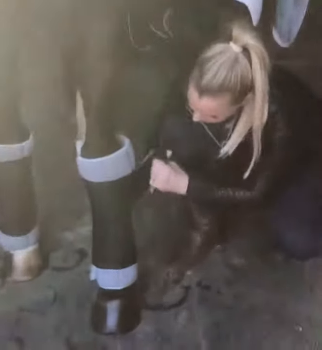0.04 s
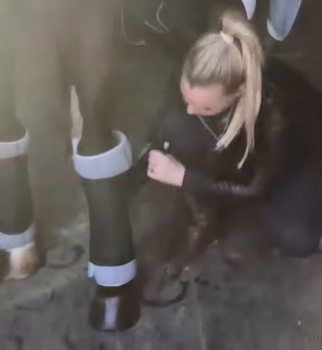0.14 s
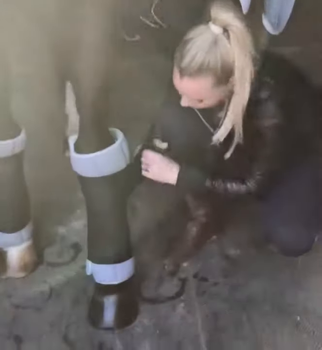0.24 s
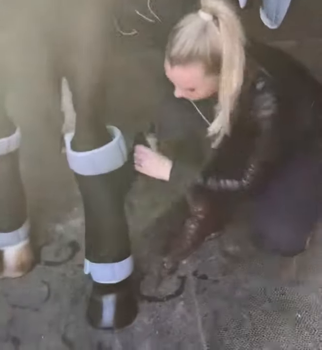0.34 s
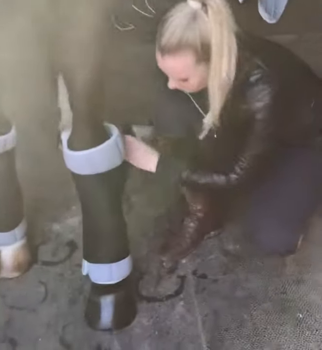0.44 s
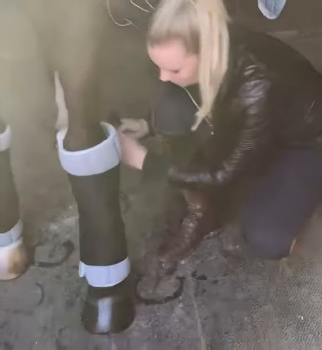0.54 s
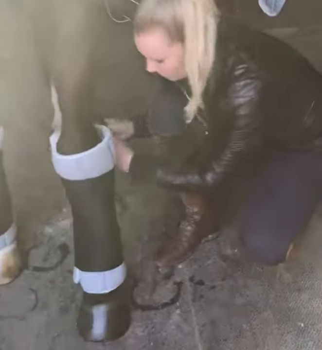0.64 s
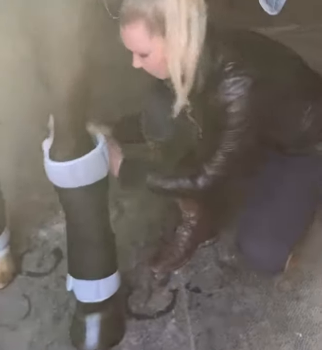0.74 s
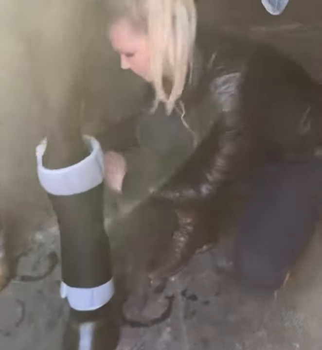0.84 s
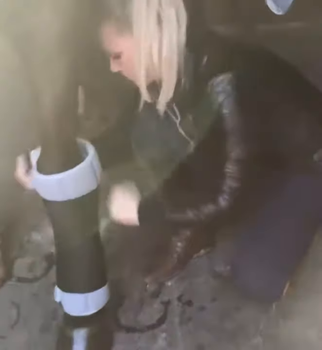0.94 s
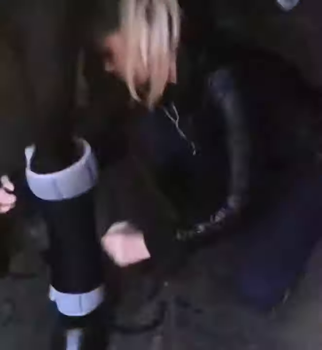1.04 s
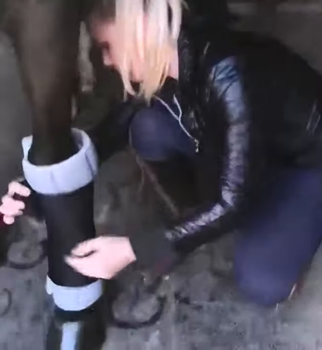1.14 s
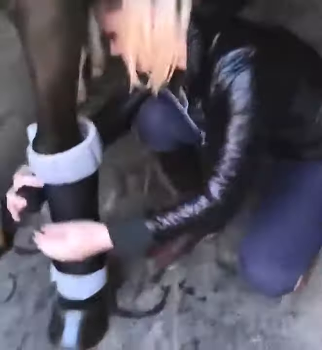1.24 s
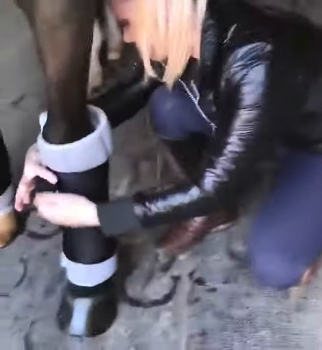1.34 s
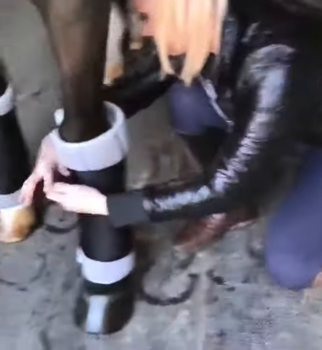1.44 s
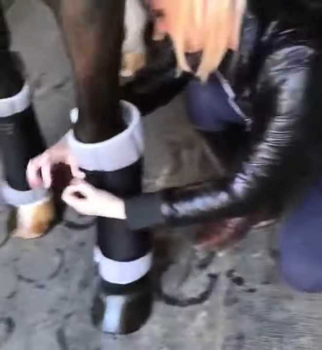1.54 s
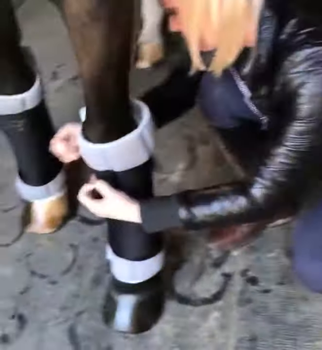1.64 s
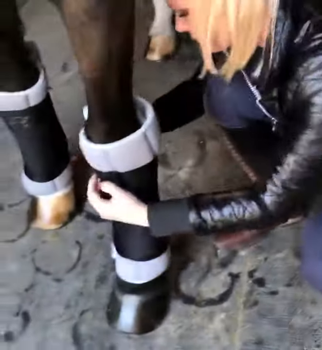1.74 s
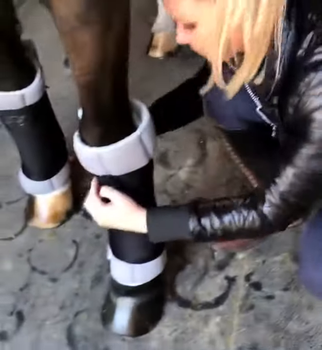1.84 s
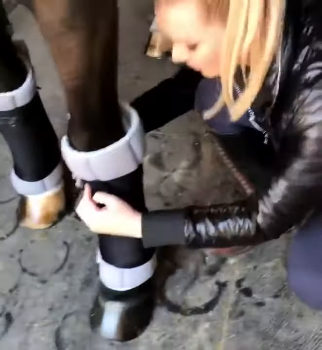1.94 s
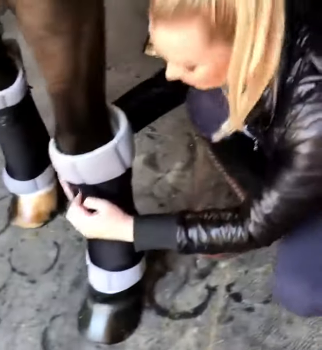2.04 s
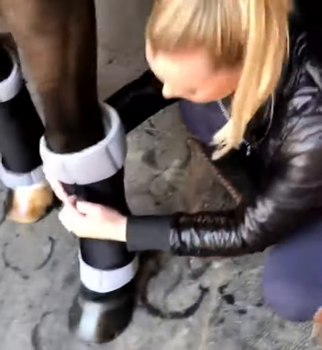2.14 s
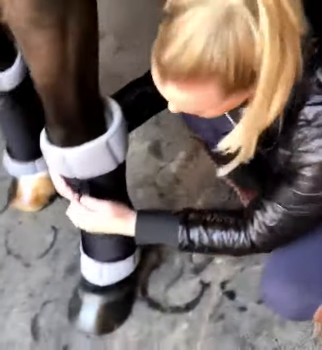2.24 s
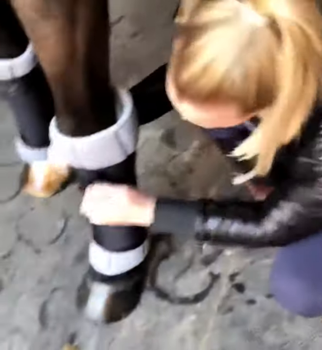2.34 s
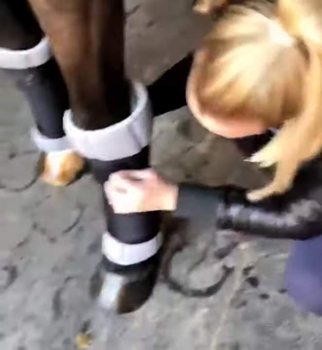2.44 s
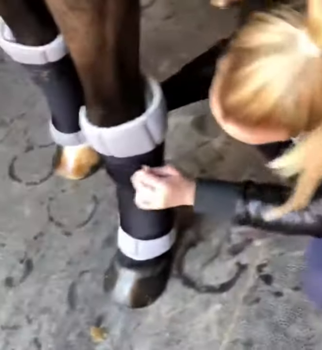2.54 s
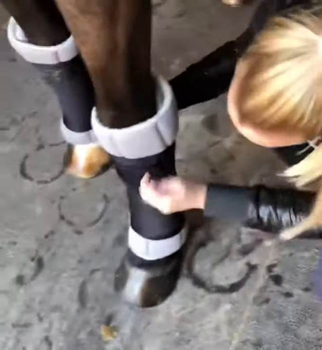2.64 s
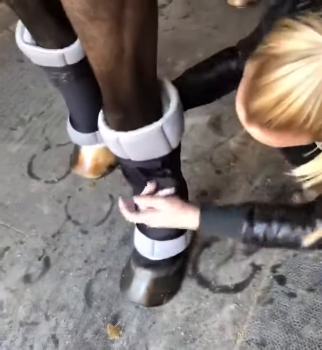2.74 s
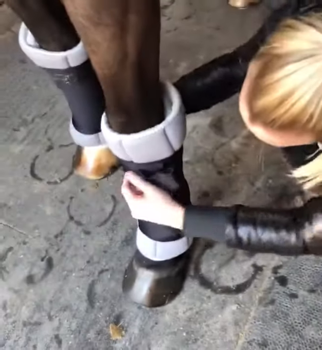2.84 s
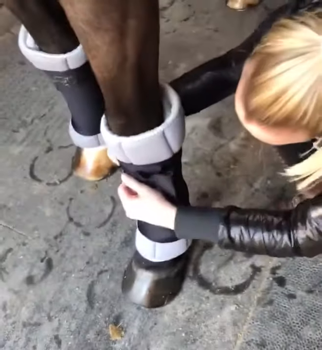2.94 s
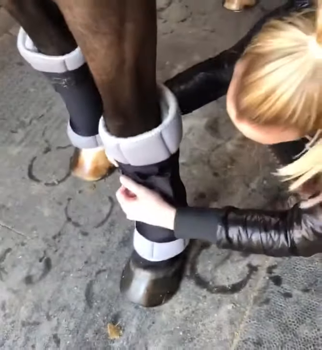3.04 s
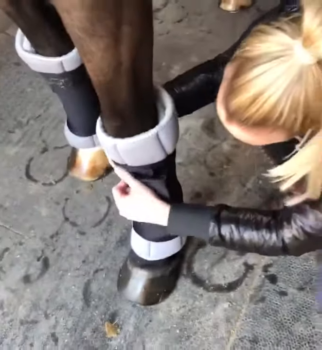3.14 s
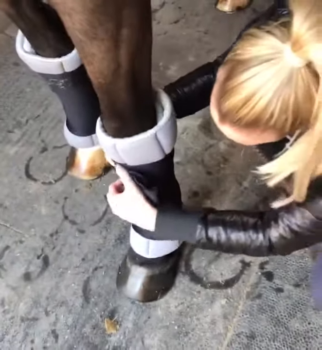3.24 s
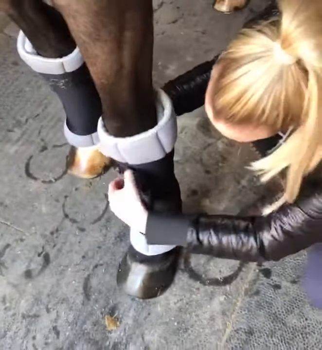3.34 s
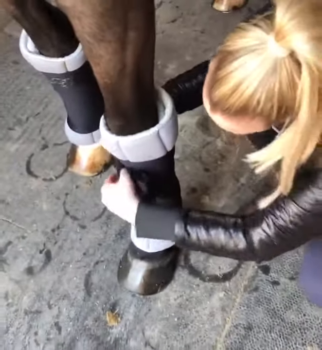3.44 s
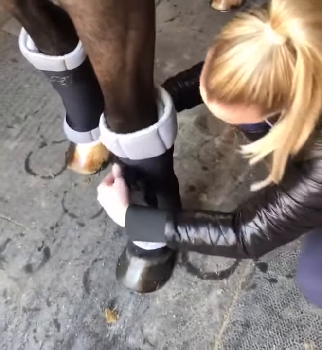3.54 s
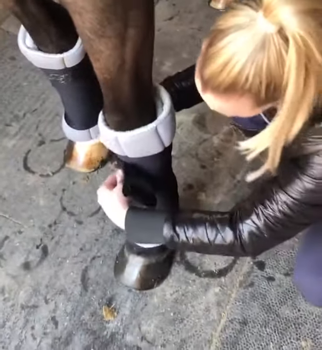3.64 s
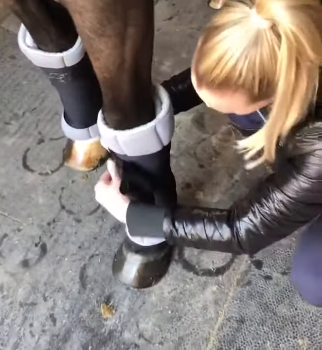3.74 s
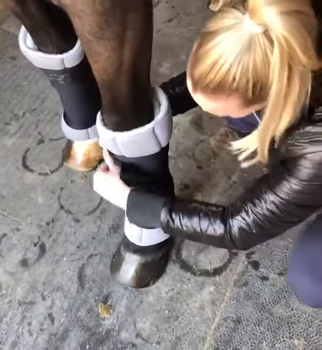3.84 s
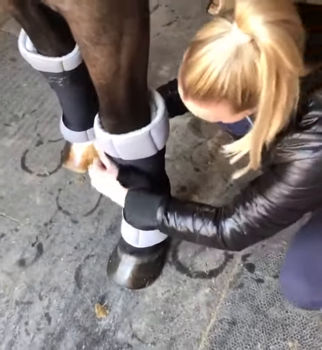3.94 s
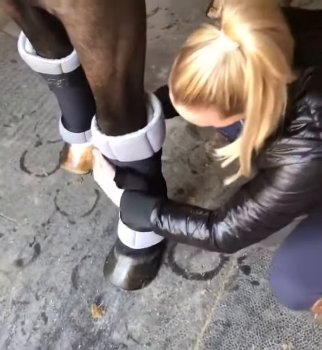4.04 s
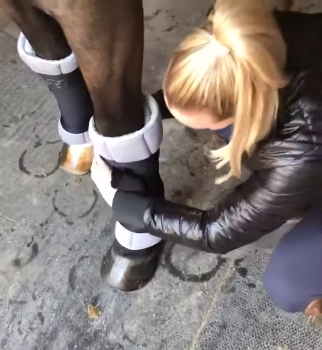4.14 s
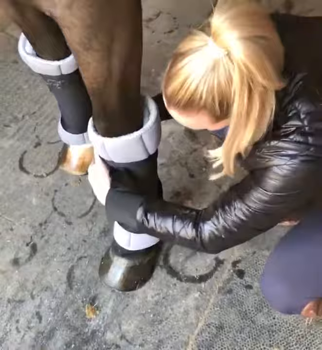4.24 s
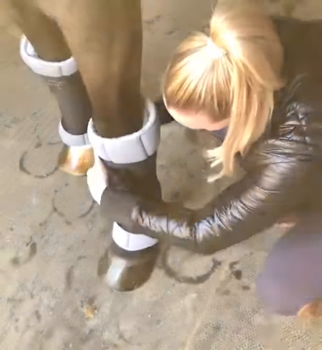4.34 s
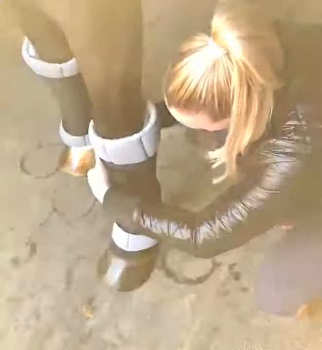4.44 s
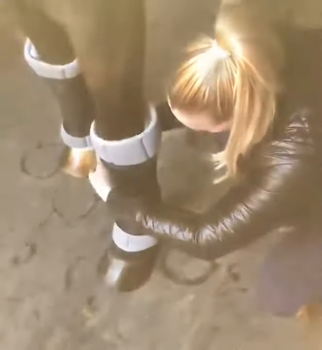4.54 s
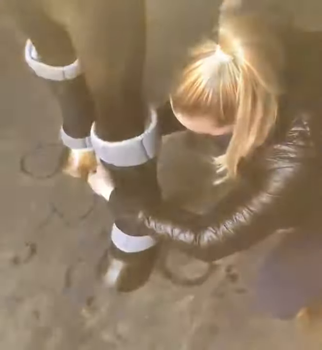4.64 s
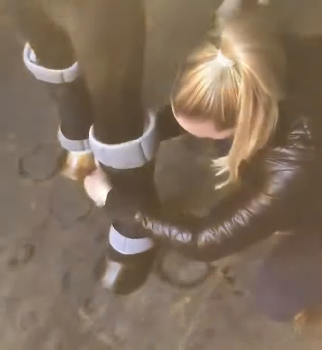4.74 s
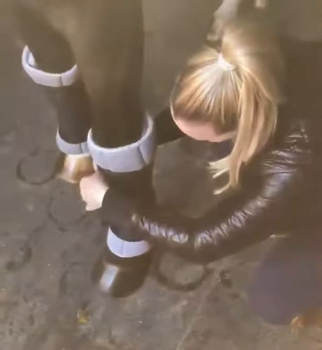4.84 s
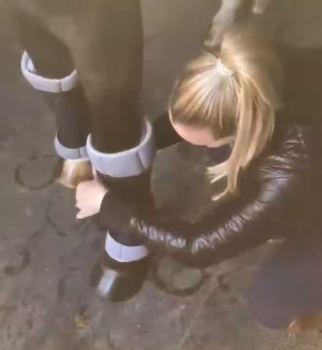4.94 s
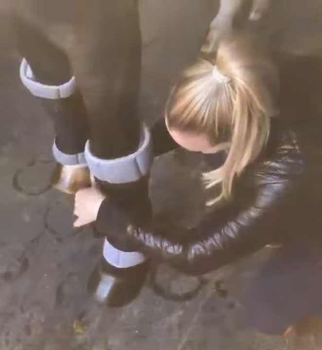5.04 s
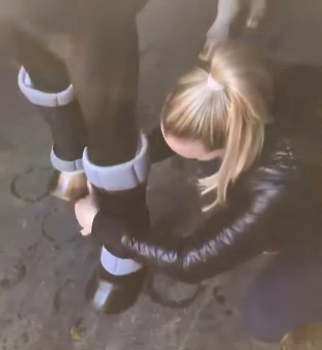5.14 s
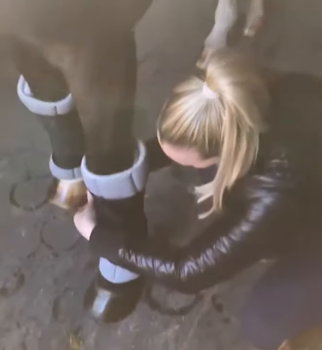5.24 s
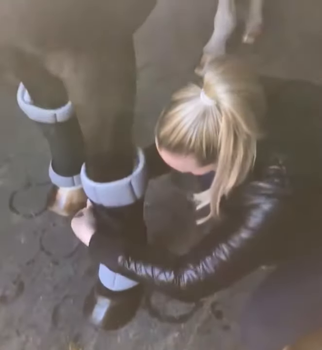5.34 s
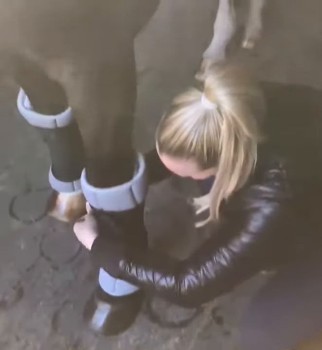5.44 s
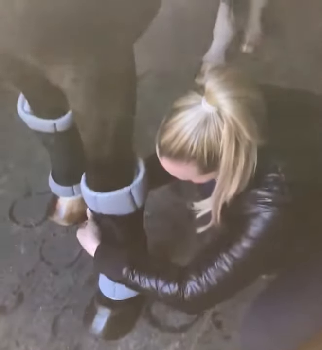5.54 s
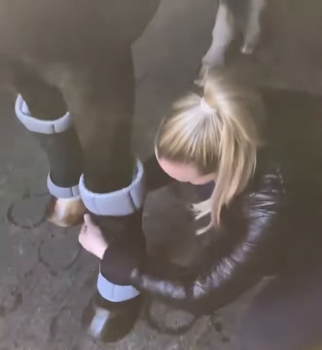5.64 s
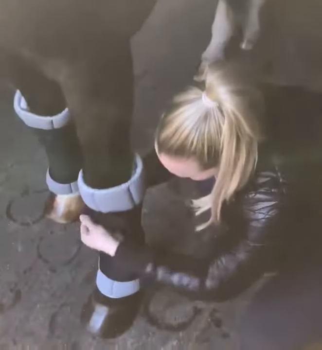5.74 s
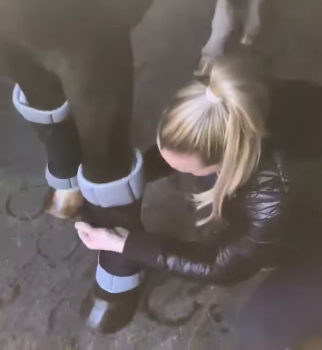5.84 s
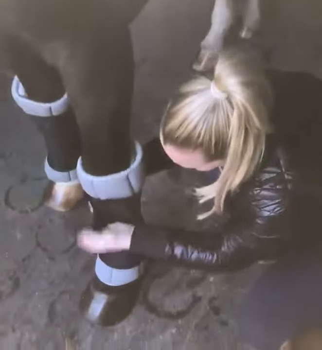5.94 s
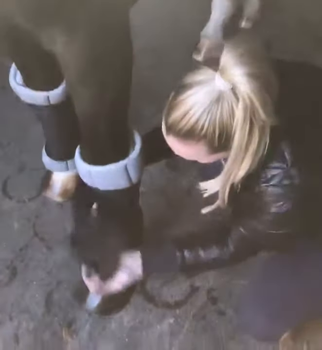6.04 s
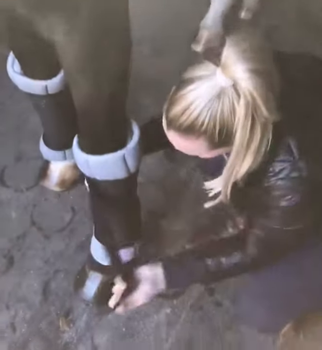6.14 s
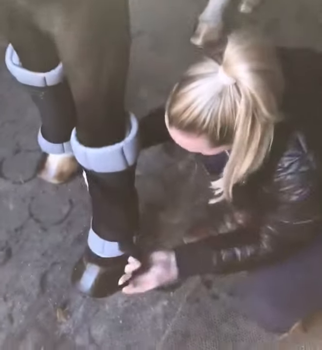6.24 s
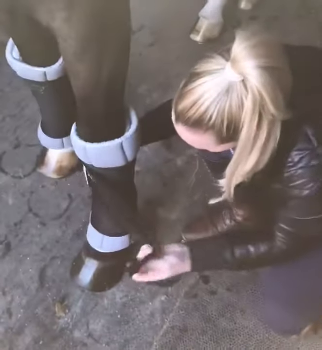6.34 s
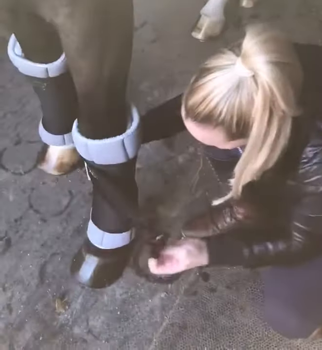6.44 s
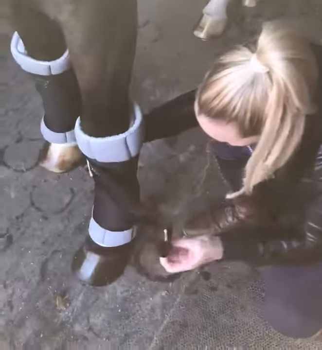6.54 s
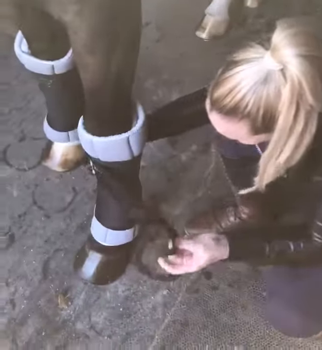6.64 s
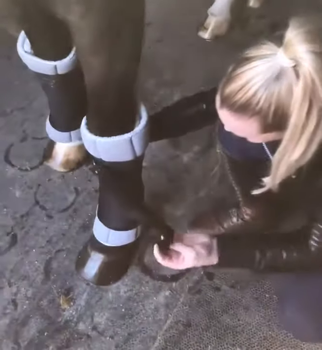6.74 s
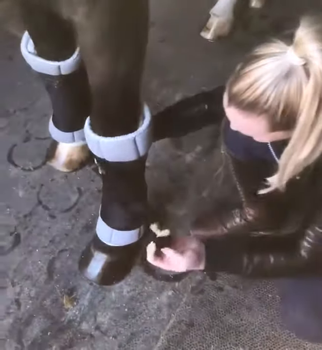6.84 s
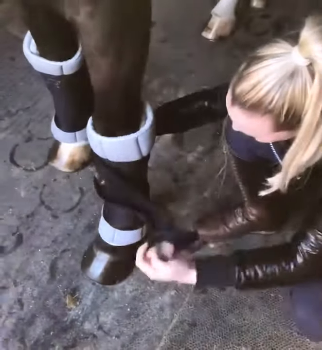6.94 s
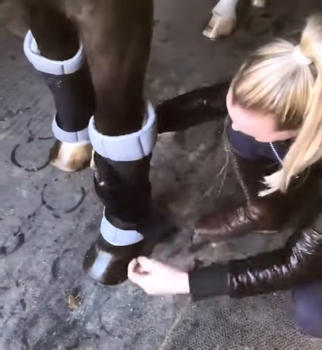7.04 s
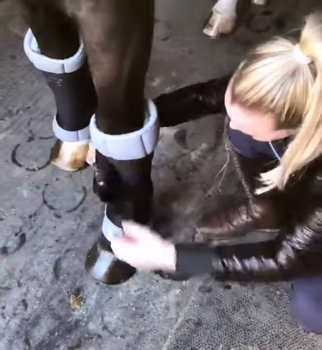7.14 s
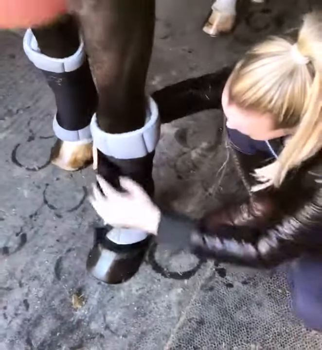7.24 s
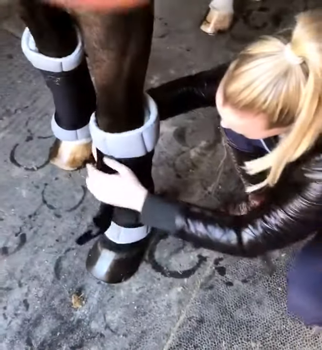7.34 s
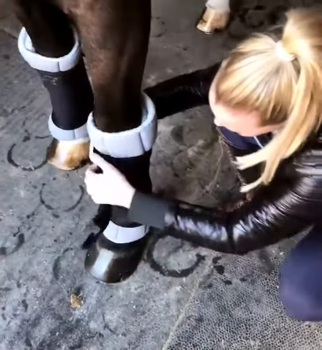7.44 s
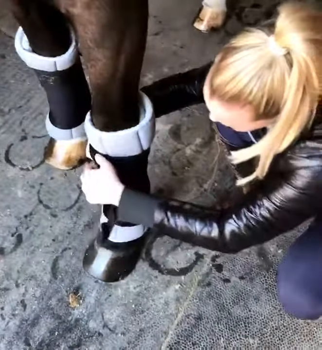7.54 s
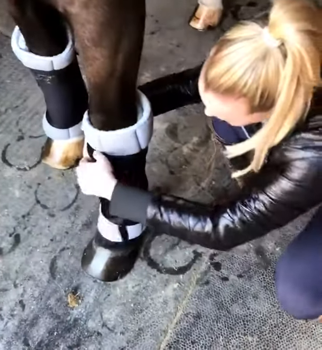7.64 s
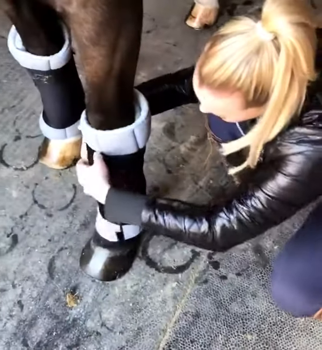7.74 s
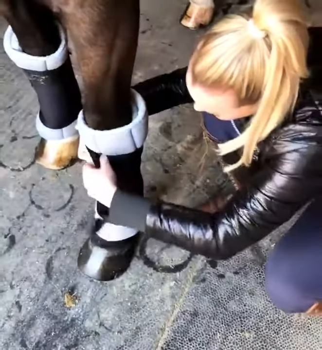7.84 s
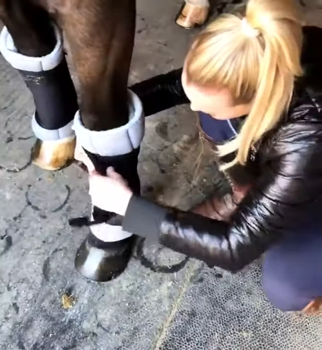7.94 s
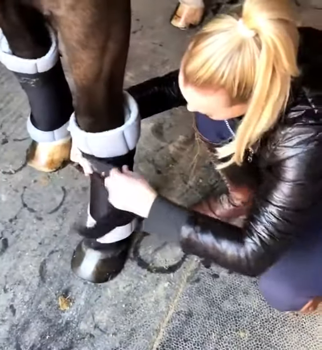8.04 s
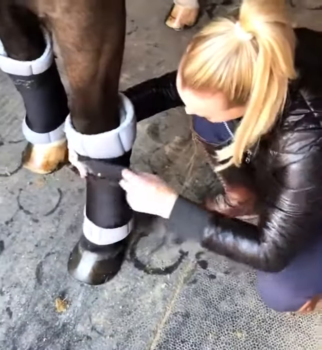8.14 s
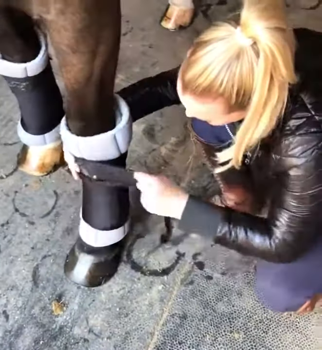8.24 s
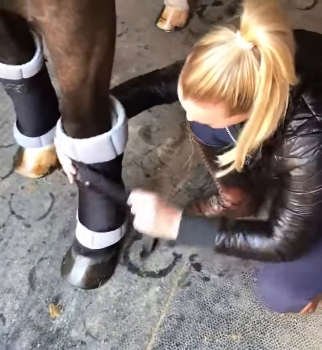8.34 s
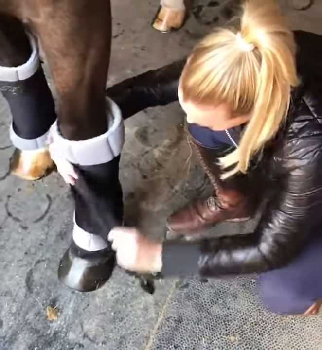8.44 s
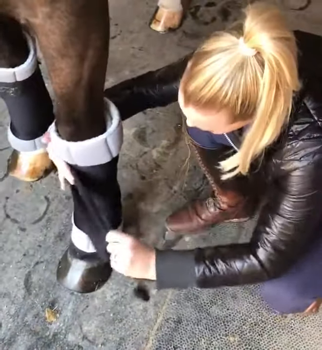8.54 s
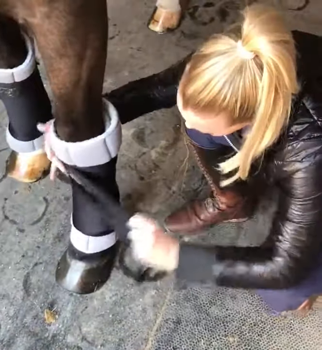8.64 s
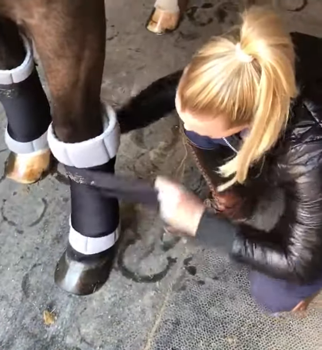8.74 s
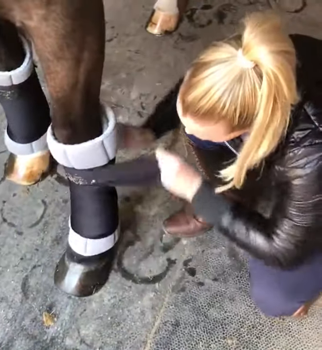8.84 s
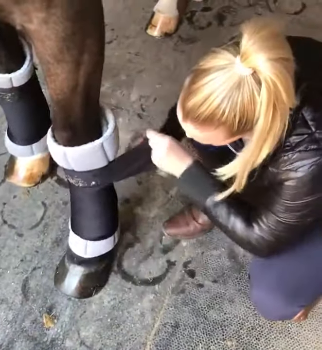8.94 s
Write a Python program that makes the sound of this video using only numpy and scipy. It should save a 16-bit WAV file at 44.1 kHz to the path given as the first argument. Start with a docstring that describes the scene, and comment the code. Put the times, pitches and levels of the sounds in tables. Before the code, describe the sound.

Close, fairly dry sound of hands working on a horse's leg wrap: crisp cloth strokes, pats on padding, tiny snaps and ticks. A faint metallic ring sounds midway, then a strap is torn open in a brief, loud, crackling surge that stops with a knock. Afterwards it is calmer, with short rustles and clicks. A distant low hum, gentle building hiss and occasional soft floor rumble stay underneath.

```python
"""Fitting a horse's leg wrap

In a stable, sleeves and wrap rustle and slide (noise and tiny clicks, shaped stroke by stroke), hooks snap and
hands pat the padding (short puffs of noise), and one strap of hooks and loops is torn open (dense clicks in surges).
Small clicks, knocks and a metal clank are fading sine waves. Behind them a distant motor hums (a stack of sines),
a second low tone joins for a while, the floor rumbles now and then, and the building's air hisses (steady noise)."""
import sys
import numpy as np
from scipy import signal
from scipy.fft import rfft, irfft, next_fast_len
from scipy.io import wavfile

SR = 44100
rng = np.random.default_rng(int(sys.argv[2]) if len(sys.argv) > 2 else 0)


def wav_out(sig):
    """Save sig, one row per channel (or a flat mono array), as 16-bit PCM at SR to the path in sys.argv[1]."""
    wavfile.write(sys.argv[1], SR, np.round(np.clip(np.atleast_2d(sig).T, -1, 1) * 32767).astype(np.int16))


N = 396459  # length in samples, about 9 s

# Strokes of cloth on cloth: start t/s, length/s, middle level/dB, top treble against it/dB,
# dull padding against it/dB
STROKES = [(0, 0.19, -57, -2.5, -7), (0.311, 0.11, -58, -9, -5), (0.5, 0.16, -57.5, -15, -10.5),
           (0.7, 0.25, -61, -9, -7.5), (1.08, 0.069, -60.5, -4.5, -6), (1.196, 0.052, -59.5, 0, -16),
           (1.268, 0.093, -60, -3.5, -11), (1.41, 0.03, -57.5, -0.5, -4), (1.538, 0.15, -51, -5.5, -19),
           (1.709, 0.054, -48.5, 0.5, -17.5), (1.777, 0.35, -51.5, -2.5, -17),
           (2.11, 0.32, -57.5, -3.5, -12.5), (2.4, 0.1, -53.5, -9, -10), (2.557, 0.2, -56, -5.5, -10.5),
           (2.919, 0.048, -56, -6, -15.5), (3.29, 0.055, -57.5, 1.5, -31), (3.449, 0.084, -56.5, -3.5, -12),
           (3.902, 0.14, -60, -3, -22), (4.302, 0.076, -62, -4, -4.5), (4.481, 0.16, -55, -3.5, -15),
           (4.665, 0.28, -59, -3, -15), (5.003, 0.24, -56.5, -5, -23), (5.307, 0.13, -59.5, -7, -9),
           (5.519, 0.042, -51, -4, -6.5), (5.61, 0.11, -51.5, -5.5, -17), (6.088, 0.28, -64, -27, -1),
           (6.402, 0.26, -65.5, -19, -3.5), (6.889, 0.09, -53.5, -9, -14.5),
           (7.105, 0.15, -60.5, -0.5, -14), (7.175, 0.12, -55.5, 0, -8), (7.511, 0.13, -57, -0.5, -9.5),
           (7.808, 0.084, -59.5, -4, -1.5), (7.89, 0.41, -84, -28, 21), (8.17, 0.17, -60.5, -1, -7),
           (8.378, 0.14, -60, -4.5, -2), (8.616, 0.32, -80.5, -16, 13.5), (8.914, 0.028, -61.5, -3, -10)]


def from_db(db):
    """Turn a level in dB into a gain."""
    return 10 ** (np.asarray(db) / 20)


def rms_one(x):
    """Scale a sound to an average strength (rms) of 1."""
    return x / np.sqrt(np.mean(x ** 2) + 1e-20)


def in_time(rows):
    """Draw straight lines between the rows of a curve table: one value a sample for each column."""
    s, *columns = np.transpose(rows)
    return [np.interp(np.arange(N) / SR, s, c) for c in columns]


def at_hz(points, hz):
    """Read a spectrum table at any pitch, with pitch spaced as on a keyboard (log frequency)."""
    table_hz, table_db = np.transpose(points)
    return np.interp(np.log(hz), np.log(table_hz), table_db)


def drift(rate):
    """Slow random wandering with rms 1: noise smoothed twice, so that a higher rate wanders faster."""
    r = np.exp(-80 * np.pi * rate / SR)  # one noise value per 40 samples
    noise = rng.standard_normal(N // 40 + 2002)
    slow = signal.lfilter([1], [1, -2 * r, r * r], noise)[2000:]
    return np.interp(np.arange(N) / 40, np.arange(len(slow)), rms_one(slow))


def resonance(x, hz, width_hz):
    """Let one pitch ring: a two-pole peak with gain 1 on top; the narrower, the longer it rings."""
    r = np.exp(-np.pi * width_hz / SR)
    feedback = [1, -2 * r * np.cos(2 * np.pi * hz / SR), r * r]
    return signal.lfilter([(1 - r * r) / 2, 0, (r * r - 1) / 2], feedback, x)


def coloured(x, spectrum):
    """Make each pitch of x louder or softer as a spectrum table says."""
    size = next_fast_len(N)
    hz = np.maximum(np.arange(size // 2 + 1) * SR / size, 1)
    return irfft(rfft(x, size) * from_db(at_hz(spectrum, hz)), size)[:N]


def band(x, low_hz, high_hz):
    """Keep mainly the pitches between two limits."""
    return signal.sosfilt(signal.butter(2, [low_hz, high_hz], "band", fs=SR, output="sos"), x)


def split(x, edges_hz):
    """Cut x into softly overlapping bands that add up to x between the outer edges."""
    size = next_fast_len(N)
    octave = np.log2(np.arange(1, size // 2 + 2) * SR / size)
    spectrum = rfft(x, size)
    below = [.5 - .5 * np.tanh(5 * (octave - np.log2(hz))) for hz in edges_hz]
    return [irfft(spectrum * (high - low), size)[:N] for low, high in zip(below, below[1:])]


def grains(per_s, spread_db, hiss, sharpness):
    """Fibres slipping: uneven clicks, each ringing briefly at one of 16 pitches, over a fine hiss; rms 1."""
    sizes = from_db(spread_db * np.minimum(rng.exponential(1, N), 5)) * rng.choice([-1, 1], N)
    clicks = sizes * (rng.random(N) < per_s / SR) + 1e-18
    dealt = rng.integers(0, 16, N)
    pitches = np.geomspace(150, 16000, num=16)
    rings = sum(resonance(clicks * (dealt == k), hz, hz / sharpness) for k, hz in enumerate(pitches))
    return rms_one(rms_one(rings) + hiss * rng.standard_normal(N))


def bursts(events, sharpness, broad, rise_s, spread):
    """Dying puffs of noise: part rings at the puff's own colour, part fills a band around it."""
    length = 16384  # every puff is also faded to nothing within this many samples, 0.37 s
    out, t = np.zeros(N + length), np.arange(length) / SR
    for (s, db, hz, t60), noise in zip(events, rng.standard_normal((len(events), length))):
        fade = from_db(-60 * t / max(t60, .003)) * (1 - t / t[-1])
        puff = noise * fade * np.minimum(t / rise_s, 1)
        rung = rms_one(resonance(puff, hz, hz / sharpness))
        wide = rms_one(band(puff, hz / spread, min(hz * spread, .4 * SR)))
        x = rung + broad * wide
        out[round(s * SR):][:length] += from_db(db) * x / np.abs(x).max()
    return out[:N]


def stable_air():
    """Steady rumble and hiss of the building: coloured noise whose level trembles slightly."""
    # Colour of the air: f/Hz, gain/dB
    air_colour = [(20, -30), (40, -20.5), (64, -2), (119, -6.5), (169, -5), (315, -10.5), (459, -20),
                  (1000, -18), (3200, -24), (6300, -33), (9000, -44.5), (15700, -33.5)]
    level_db = -64  # of the part above 340 Hz
    x = coloured(rng.standard_normal(N), air_colour)
    return from_db(level_db + 0.53 * drift(18.0)) * x / np.std(band(x, 340, 22000))


def motor():
    """Sines at multiples of the turning rate; each swells and fades on its own on the way here."""
    # Parts of the hum: multiple of the turning rate, level/dB
    multiples = [(2, -60.5), (3, -67.5), (4, -71), (5, -62), (6, -66.5), (7, -71), (8, -77.5), (9, -73),
                 (10, -77)]
    # Slow swell about those levels: t/s, second multiple/dB, seventh multiple/dB, fifth multiple/dB
    swell_curves = [(0.0, 3, 7.5, 3), (0.45, -7, 6, 4.5), (1.85, 3, 6.5, -3.5), (4.5, 1, -1.5, -2.5),
                    (7, -0.5, -3.5, 0), (8.16, -4, 5.5, 0.5), (8.99, 1.5, -0.5, -6)]
    motor_hz = 32.3  # average turning rate
    swell_db = dict(zip([2, 7, 5], in_time(swell_curves)))
    turn = 2 * np.pi * np.cumsum(motor_hz * (1 + 0.00086 * drift(0.43))) / SR
    out = np.zeros(N)
    for (k, db), start in zip(multiples, rng.uniform(0, 2 * np.pi, len(multiples))):
        level_db = db + swell_db.get(k, 2.7 * drift(0.37))
        out += np.sqrt(2) * from_db(level_db) * np.sin(k * turn + start)
    return out


def drone():
    """A second low tone that beats with the hum for a while: one sine that fades in and out."""
    # Course of the tone: t/s, f/Hz, level/dB
    tone_course = [(.6, 94.2, -63), (2.2, 94.2, -64), (5.5, 94.2, -73)]
    t, (hz, db) = np.arange(N) / SR, in_time(tone_course)
    fade = np.clip(np.minimum(t - tone_course[0][0], tone_course[-1][0] - t) / 0.52, 0, 1)
    return np.sqrt(2) * fade * from_db(db) * np.sin(2 * np.pi * np.cumsum(hz) / SR)


def rumbles():
    """Low rumbles through the floor: deep puffs of noise with a soft start."""
    # Rumbles: t/s, peak/dB, colour f/Hz, t60/s (time to fade by 60 dB, before the puff's own end fade)
    rumble_events = [(6.0, -45.5, 113, 0.7), (8.27, -53, 50, 2.5)]
    return bursts(rumble_events, sharpness=2.6, broad=0.3, rise_s=0.028, spread=1.3)


def clank():
    """Loose metal knocked: sines ring together, the lowest builds up late, then all are damped."""
    # Ways the metal rings: f/Hz, level/dB against the clank's level, t60/s, build-up/s
    metal_modes = [(366, 0.5, 0.95, 0.019), (632, -9, 0.31, 0.0037), (1415, -8, 0.3, 0.0028),
                   (1600, -8, 0.47, .003), (1911, -2, 0.5, 0.002), (2170, 19, 0.066, 0.01),
                   (2080, -1.5, 0.36, 0.004), (1265, -5, 0.1, 0.002)]
    clank_s, clank_db = 4.785, -46
    damped_s, damping_db, wobble_db = .062, 10, 3  # damping starts this long after the knock
    t = np.maximum(np.arange(N) / SR - clank_s, 0)
    rings = np.zeros(N)
    for k, (hz, db, t60, swell) in enumerate(metal_modes):
        gain = from_db(db - 60 * t / t60 + wobble_db * drift(45)) * np.minimum(t / swell, 1)
        rings += gain * np.sin(2 * np.pi * hz * t) * (-1) ** k
    drop_db = np.clip(2500 * (t - damped_s), 0, damping_db)
    return from_db(clank_db - drop_db) * rings


def ticks():
    """Clean clicks and knocks: one sharp push rings a few cycles; harder cracks add higher and lower tones."""
    # Clicks and knocks: t/s, level/dB, ring f/Hz, t60/s, crack (0 to 1)
    tick_events = [(2.3347, -43, 360, 0.027, 0.3), (3.275, -42.5, 1450, 0.0063, 0.7),
                   (3.984, -42, 3970, 0.0035, 0.4), (6.011, -33, 945, 0.057, .1),
                   (6.0167, -19.5, 2650, 0.006, 0.2), (7.176, -29, 2210, 0.0039, 0.76),
                   (7.756, -46.5, 1280, 0.0094, .2), (7.779, -39, 2020, 0.0053, .3),
                   (8.268, -34, 1750, 0.0051, 0.26)]
    out, t = np.zeros(N), np.arange(4096) / SR
    for s, db, hz, t60, crack in tick_events:
        turn, fade = 2 * np.pi * hz * t, from_db(-60 * t / t60)
        ring = fade * np.sin(turn) + .8 * fade ** 1.4 * np.sin(1.7 * turn)
        ring += crack * (fade ** 1.4 * np.sin(2.7 * turn) - np.sqrt(fade) * np.sin(turn / 2) / 2)
        out[round(s * SR):][:4096] += from_db(db) * np.minimum(t * hz, 1) * ring * 2
    return out


def pats():
    """Hands patting the padding: dull puffs of noise."""
    # Pats: t/s, peak/dB, colour f/Hz, t60/s
    pat_events = [(0.499, -42, 360, 0.079), (1.486, -43, 277, 0.033), (2.027, -43.5, 335, 0.067),
                  (2.049, -38.5, 784, 0.15), (2.095, -42.5, 934, 0.13), (2.465, -40.5, 446, 0.035),
                  (2.606, -40, 480, 0.21), (2.611, -42, 1020, 0.062), (2.635, -48, 570, 0.063),
                  (4.513, -32, 1000, 0.016), (4.697, -38.5, 990, 0.088), (5.349, -41, 860, 0.03),
                  (5.706, -34.5, 1030, 0.015)]
    return bursts(pat_events, sharpness=2.2, broad=0.5, rise_s=0.004, spread=1.8)


def snaps():
    """Single hooks and creases snapping: mostly bright puffs of noise with a wide spread of pitches."""
    # Snaps: t/s, peak/dB, colour f/Hz, t60/s
    snap_events = [(0.7937, -38.5, 3660, 0.18), (1.28, -33.5, 3300, 0.039), (1.3079, -36, 7270, 0.016),
                   (1.526, -35.5, 3400, 0.05), (1.6062, -26.5, 4270, 0.046), (1.641, -35, 5500, 0.025),
                   (2.0972, -31.5, 7700, 0.04), (2.4638, -30, 7750, 0.0095), (3.138, -49, 6340, 0.04),
                   (3.1714, -43, 7400, 0.096), (3.226, -38.5, 7460, 0.045), (3.3754, -44, 8500, 0.025),
                   (3.4037, -41.5, 8400, 0.034), (3.6506, -36, 7000, 0.036), (3.77, -43.5, 980, 0.024),
                   (4.5132, -32, 1470, 0.038), (4.6959, -31.5, 1580, 0.03), (4.785, -35, 1720, 0.028),
                   (4.8606, -31, 5130, 0.012), (4.8868, -39.5, 3360, 0.067), (5.0394, -41.5, 1700, 0.06),
                   (5.0542, -41, 3190, 0.022), (5.0883, -45, 7330, 0.038), (5.49, -35.5, 3480, 0.041),
                   (5.5225, -32.5, 8600, 0.059), (5.7055, -28.5, 1600, 0.021), (5.7353, -30, 3490, 0.01),
                   (6.258, -43.5, 2300, 0.04), (6.3392, -34, 4050, 0.033), (7.828, -32.5, 6440, 0.033)]
    return bursts(snap_events, sharpness=4.0, broad=0.97, rise_s=0.0037, spread=4.6)


def slides():
    """Sleek fabric sliding: dense uneven scratches through a resonance that each slide sets."""
    # Slides: start t/s, length/s, level/dB, colour f/Hz
    slide_events = [(1.696, 0.23, -59, 3330), (1.694, 0.3, -54, 6400), (4.223, 0.18, -67, 2770),
                    (4.53, 0.21, -57, 8700), (4.815, 0.15, -57, 7950), (5.046, 0.16, -61, 7900)]
    broad_hz, edge_s = 30000, .03  # a colour as high as broad_hz would be as wide as it is high
    t, out = np.arange(N) / SR, np.zeros(N)
    scratch = rng.standard_normal(N) * from_db(4.5 * drift(300) + 2.5 * drift(40))
    for s, length, db, hz in slide_events:
        width_hz = hz ** 2 / broad_hz
        tone = resonance(resonance(scratch, hz, width_hz), hz, width_hz)
        sliding = np.clip(np.minimum(t - s, s + length - t) / edge_s + .5, 0, 1)
        out += from_db(db) * rms_one(tone) * sliding
    return out


def stroking(levels_db, rest_db):
    """Gain of a band: each stroke rises, sags a little and falls away; powers add over the resting level."""
    rise_db_per_s, fall_db_per_s, sag_db_per_s = 516, 324, 7.5  # into, out of and along a stroke
    t = np.arange(0, N / SR + .002, .002)
    start, length = np.array(STROKES)[:, :1], np.array(STROKES)[:, 1:2]
    shape_db = -rise_db_per_s * np.maximum(start - t, 0)
    shape_db -= sag_db_per_s * np.clip(t - start, 0, length)
    shape_db -= fall_db_per_s * np.maximum(t - start - length, 0)
    power = np.sum(from_db(levels_db[:, None] + shape_db) ** 2, axis=0) + from_db(rest_db) ** 2
    return np.interp(np.arange(N) / SR, t, np.sqrt(power))


def catches():
    """Brief snags of the cloth: a gain that jumps at random moments and dies back at once."""
    per_s, largest_db, t60_s = 6.8, -3, 0.034
    snags = (rng.random(N) < per_s / SR) * rng.uniform(0, from_db(largest_db), N)
    return 1 + signal.lfilter([1], [1, -from_db(-60 / (t60_s * SR))], snags + 1e-18)


def rustle():
    """Cloth on cloth: slips come in clumps, and the colour shifts as other folds take over."""
    # Colour of the cloth: f/Hz, gain/dB
    cloth_colour = [(350, 2.5), (600, 0.5), (1800, 1.5), (2600, 2.5), (3200, 4), (6400, 3.5), (9000, 4),
                    (15700, -4.5)]
    # Cloth never quite at rest: middle level/dB, top treble level/dB, dull level/dB
    fidget_db = [-65.5, -71.5, -81]
    fold_shift_db, fold_shift_rate, low_fold_db = 1.6, 6, -5
    _, _, level_db, top_db, dull_db = np.transpose(STROKES)
    rest_db, rest_top_db, rest_dull_db = fidget_db

    slips = grains(5000 * from_db(4.0 * drift(30)), spread_db=1.5, hiss=1.0, sharpness=3.2)
    x = coloured(slips, cloth_colour)
    dull, low_fold, *folds, top = split(x, [200, 1400, 2500, 3600, 5700, 9000, 21000])
    middle = sum(fold * from_db(fold_shift_db * drift(fold_shift_rate)) * catches() for fold in folds)
    middle = rms_one(middle) * stroking(level_db, rest_db)
    # the fold next above the padding moves midway between the dull and middle levels
    low_gain = stroking(level_db + dull_db / 2, (rest_db + rest_dull_db) / 2)
    middle = middle + rms_one(low_fold) * from_db(low_fold_db) * low_gain
    dull = rms_one(dull) * stroking(level_db + dull_db, rest_dull_db)
    top = rms_one(top) * stroking(level_db + top_db, rest_top_db)
    return from_db(2.0 * drift(36)) * (dull + catches() * (middle + top))


def tear():
    """Thousands of hooks a second pop free, in surges, and ring the stiff backing of the strap."""
    # Strap torn open: t/s, level of the highs/dB before surges, lows against it/dB
    tear_course = [(5.735, -51, -2), (5.75, -43, -16), (5.83, -32.5, -13.5), (5.85, -32, -9),
                   (5.9, -30, -7.5), (5.97, -39.5, -7), (6.02, -36.5, -11), (6.04, -37.5, -6.5),
                   (6.085, -45.5, -4), (6.106, -67, -6)]
    # Rows of hooks that let go together: t/s, surge/dB, spread to each side/s
    surge_events = [(5.754, 12, 0.0051), (5.778, 9.5, 0.0065), (5.807, 4.5, 0.0075), (5.873, 3, 0.015),
                    (5.93, 4.5, 0.01), (5.958, 3.5, 0.005), (5.996, 10, 0.017), (6.018, 5, 0.0052)]
    # Colour of the strap: f/Hz, gain/dB
    strap_colour = [(110, -10.5), (280, -6.5), (490, -16), (1250, -13), (2000, -11), (2700, 1.5),
                    (8300, 14), (15700, 5.5)]
    # Rings of the backing: f/Hz, width/Hz, gain/dB
    strap_rings = [(1000, 210, 14), (1600, 130, 10.5), (2990, 1300, 13.5)]
    flicker_db, flicker_rate = 3, 30  # each ring comes and goes as the free end flaps
    t, (level_db, lows_db) = np.arange(N) / SR, in_time(tear_course)
    surge_db = sum(db * np.exp(-.5 * ((t - s) / half) ** 2) for s, db, half in surge_events)

    pops = grains(7000 * from_db(3 * drift(120)), spread_db=2.0, hiss=.6, sharpness=5.9)
    x = coloured(pops, strap_colour)
    rings = np.zeros(N)
    for hz, width_hz, db in strap_rings:
        flickering = x * from_db(flicker_db * drift(flicker_rate))
        rings += from_db(db) * resonance(flickering, hz, width_hz)
    lows, highs = split(x + rings, [50, 2200, 21000])
    pulling = (t > tear_course[0][0]) & (t < tear_course[-1][0])
    return pulling * from_db(level_db + surge_db) * (rms_one(lows) * from_db(lows_db) + rms_one(highs))


def room(x):
    """Reflections: a dying, dull noise tail that starts after the first wall."""
    t60_s = .2
    t = np.arange(int(.4 * SR)) / SR
    tail = band(rng.standard_normal(len(t)), 320, 7700) * from_db(-60 * t / t60_s) * (t > .006)
    return signal.fftconvolve(x, tail / np.sqrt(np.sum(tail ** 2)))[:N]


def scene():
    """Near sounds and floor rumbles with a little room, over hum and air."""
    room_db = -15
    near = rumbles() + clank() + ticks() + pats() + snaps() + slides() + rustle() + tear()
    return (near + from_db(room_db) * room(near) + motor() + drone() + stable_air())[None]


def record(dry):
    """Cut the top steeply above 15850 Hz."""
    return signal.sosfilt(signal.ellip(14, .3, 70, 15850, fs=SR, output="sos"), dry)


dry = scene()
out = record(dry)
wav_out(out)
```